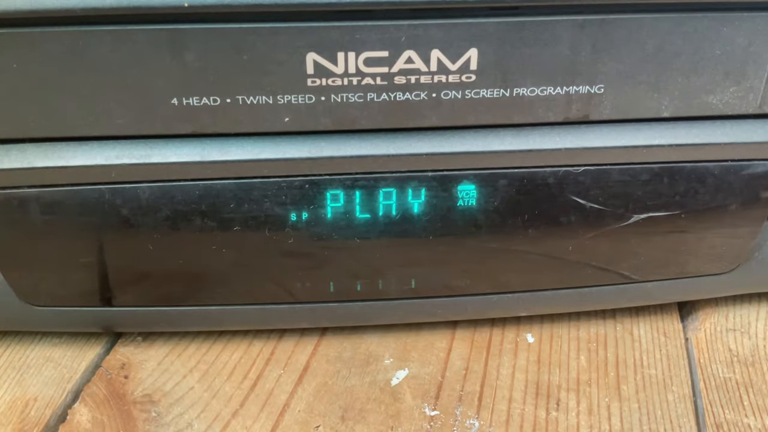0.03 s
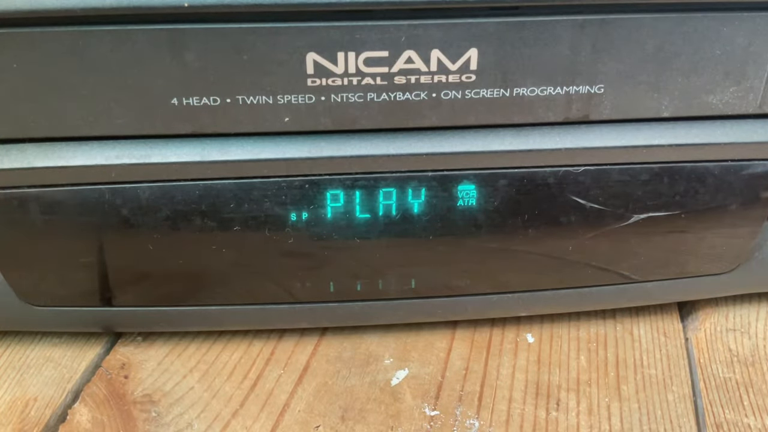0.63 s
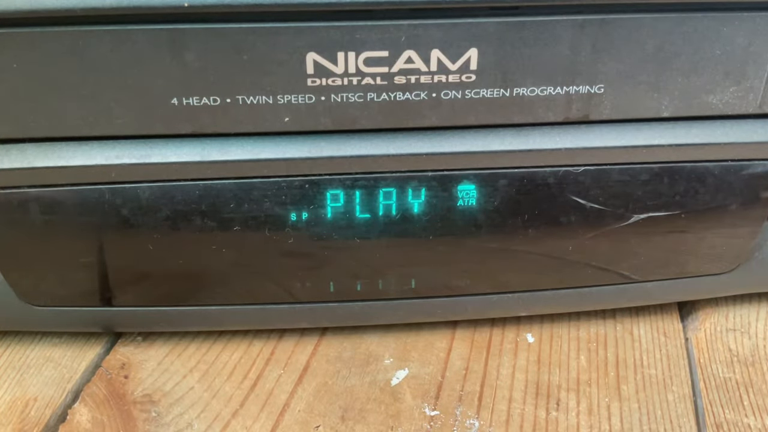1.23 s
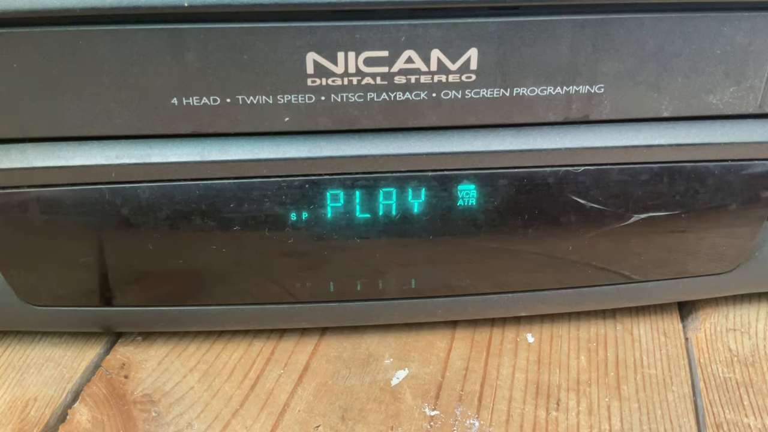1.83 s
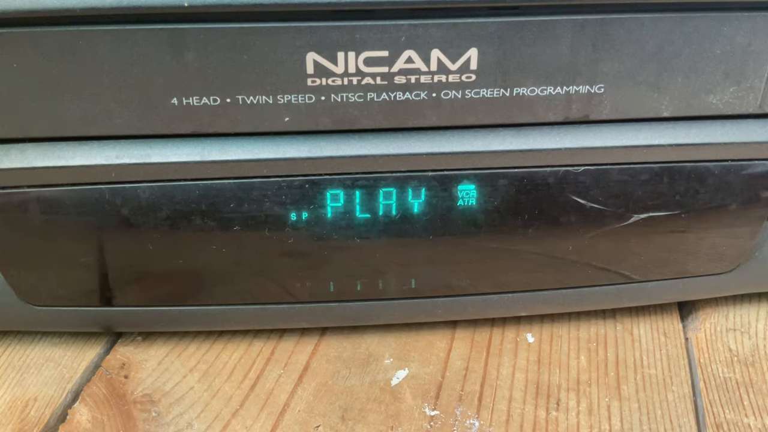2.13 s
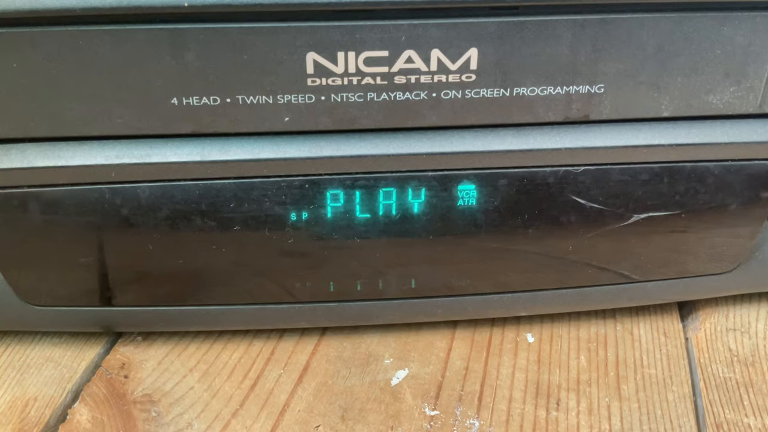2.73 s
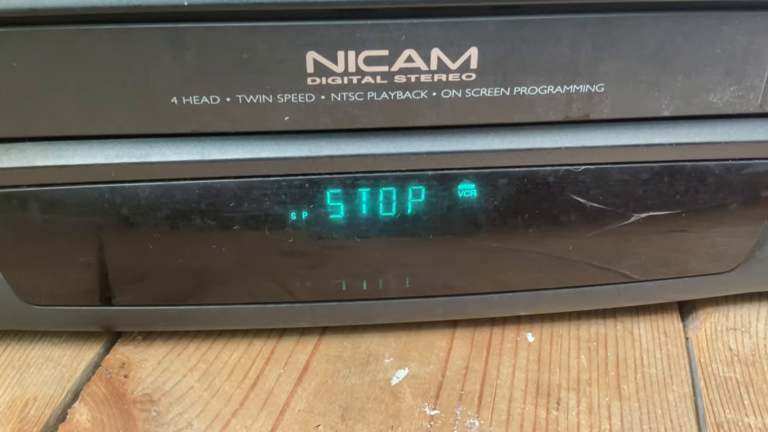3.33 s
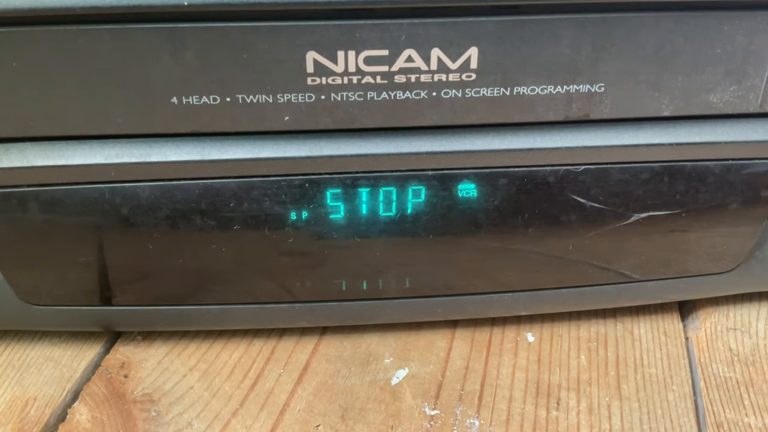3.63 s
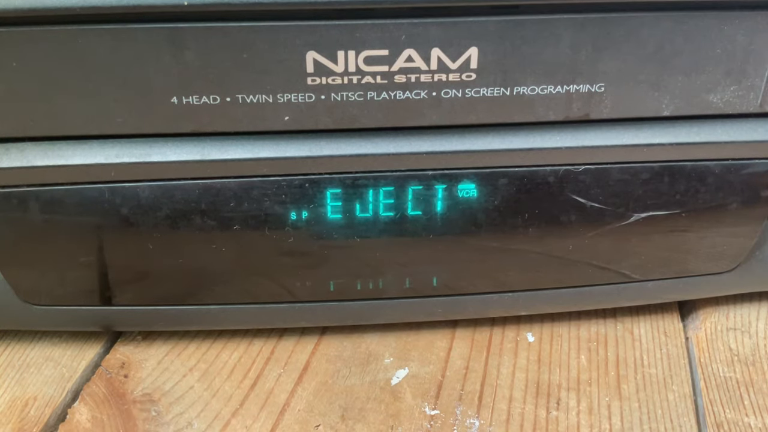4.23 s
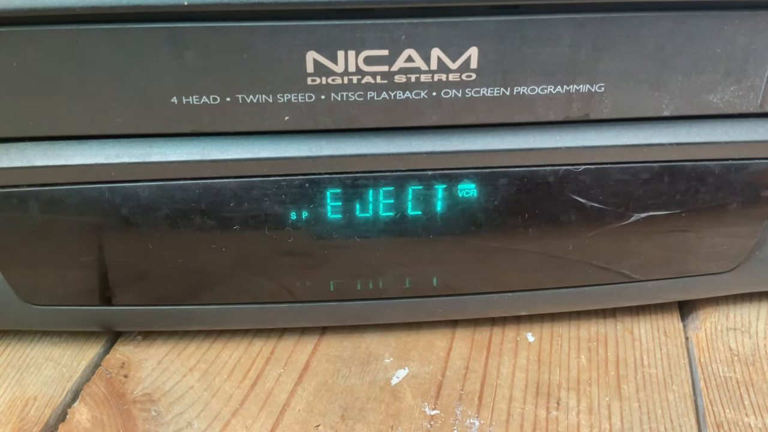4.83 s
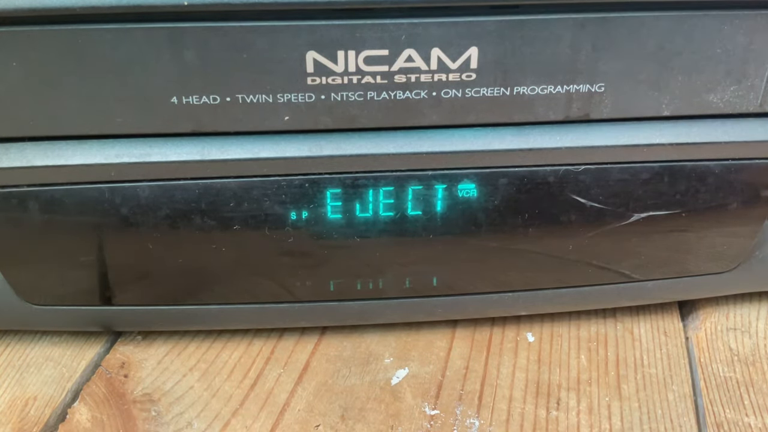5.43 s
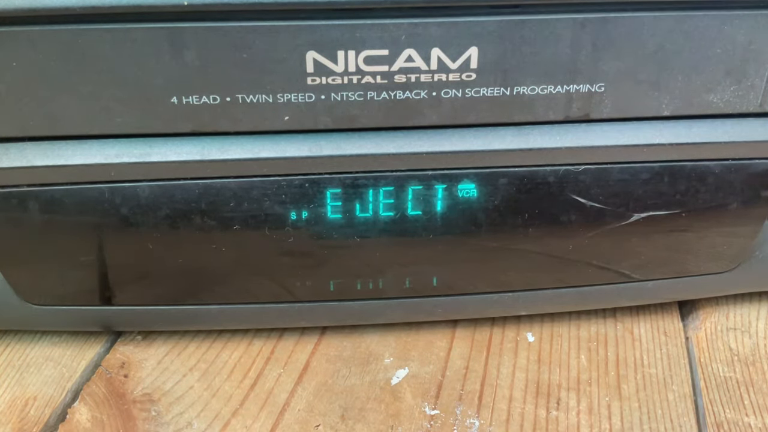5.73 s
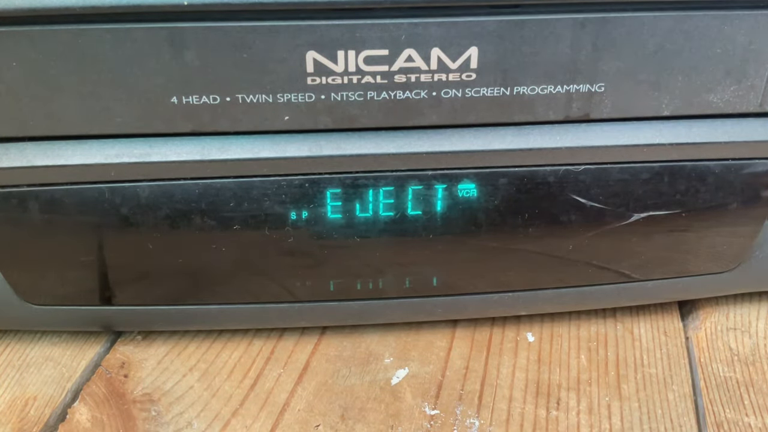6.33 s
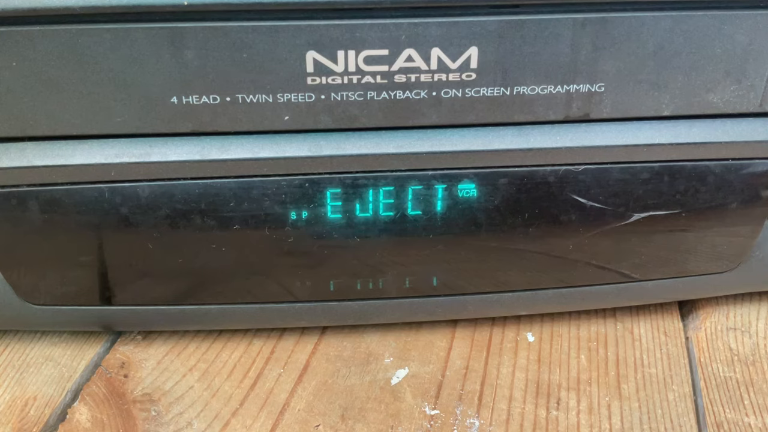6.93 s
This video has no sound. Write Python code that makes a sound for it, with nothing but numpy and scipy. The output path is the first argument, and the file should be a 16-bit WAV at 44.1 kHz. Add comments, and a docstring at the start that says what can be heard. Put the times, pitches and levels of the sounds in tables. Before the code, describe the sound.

A video recorder stops and ejects its cassette, heard close by in a quiet room. A small motor hums and whines through its gears while levers click. It rests, leaving only the faint whir of the spinning head drum. A latch snaps and the motor starts again, with sharp clunks and a very brief pause, then slides the cassette out with plastic scraping and a string of clicks.

```python
"""A video cassette deck on a wooden floor stops and ejects its cassette, close by in a quiet room.
First a small DC motor unthreads the tape through a gear train, humming and whining as levers click.
From 2.4 s it rests and the head drum whirs on. At 4 s a latch snaps, and the motor frees the cassette.
After a short pause at 5.6 s it slides the carriage out, plastic rubbing on the guides, until 7.1 s.
Throughout, each impact excites the damped modes of the deck and the cabinet."""
import sys
import numpy as np
from scipy import signal
from scipy.fft import rfft, irfft, next_fast_len
from scipy.io import wavfile
from scipy.ndimage import uniform_filter1d, map_coordinates

SR = 44100
rng = np.random.default_rng(int(sys.argv[2]) if len(sys.argv) > 2 else 0)


def waveform_to_disk(signal):
    """Save audio, clipped to [-1, 1], as 16-bit WAV at the path in sys.argv[1]."""
    frames = np.transpose(np.atleast_2d(signal))
    scaled = np.clip(frames, -1, 1) * 32767
    samples = np.round(scaled).astype(np.int16)
    wavfile.write(sys.argv[1], SR, samples)


N = 317079
TIME = np.arange(N) / SR

# Motor runs: unthread, release, slide out. All levels in the tables are relative.
# Each row: on and off in seconds, then hum, gear rumble, sliding friction and brush hiss in dB.
RUNS = [(-0.3, 2.395, -51.5, -48, -48.5, -54.5), (4.24, 5.64, -49, -51.5, -55, -52),
        (5.76, 7.09, -49, -48.5, -52.5, -51.5)]
# Shaft speed moving the tape, and the cassette. Each row: time in seconds, rotation rate in Hz.
TAPE_SPEED = [(0.0, 71.6), (0.04, 71.3), (0.38, 74.96), (0.67, 68.33), (0.79, 67.86), (0.92, 76.4),
              (1.07, 63.6), (1.14, 71.5), (1.19, 74.44), (1.31, 70.33), (1.43, 74.7), (1.6, 75.13),
              (1.87, 73.23), (2.08, 75.94), (2.19, 67.78), (2.37, 75.25), (2.55, 67.9)]
CASSETTE_SPEED = [(4.24, 60.15), (4.43, 72.4), (4.46, 73.44), (4.9, 75.96), (5.23, 74.6), (5.39, 74.75),
                  (5.5, 79.4), (5.59, 77), (5.62, 75.16), (5.85, 69.4), (5.96, 77.1), (6.0, 79.0),
                  (6.28, 74.82), (6.42, 77.37), (6.88, 79.41), (6.95, 77.6), (7.06, 79.76), (7.19, 74.0)]
# Harmonics of the hum. Each row: multiple of the shaft rate, level in dB.
UNTHREAD_ORDERS = [(2, -15.5), (3, 3), (4, -1.5), (5, -16), (6, -22), (7, -14.5), (8, -21.5), (9, -6),
                   (10, -8), (11, -14), (12, -8), (13, -13), (16, -28), (18, -10.5), (24, -13)]
EJECT_ORDERS = [(3, 1), (4, -15.5), (5, -14), (6, -6.5), (7, -14), (9, -5), (12, -12), (13, -20), (14, -21),
                (16, -11.5), (17, -8), (18, -14.5), (21, -14.5), (23, -18), (24, -25), (27, -8.5)]
# Drive load, rotor shake and gear whine, one list a run. Each row: time in seconds, level in dB.
LOAD = [
    [(0.0, -50), (0.58, -52.5), (0.85, -47), (1.14, -54.5), (1.93, -53), (2.29, -55), (2.34, -51),
     (2.4, -56.5)],
    [(4.24, -32), (4.308, -49), (4.958, -47.5), (5.274, -50.5), (5.456, -46.5), (5.6, -45)],
    [(5.76, -46.5), (6.11, -45), (6.562, -46), (6.96, -47), (7.1, -44.5)],
]
SHAKE = [
    [(0.0, -57), (0.06, -56), (0.19, -85), (0.25, -66), (0.55, -64.5), (0.9, -52), (1.08, -77),
     (1.24, -53.5), (1.36, -62), (2.54, -57.5), (2.58, -66)],
    [(4.3, -67), (4.418, -48.5), (4.476, -47), (4.556, -46.5), (4.596, -54.5), (4.746, -49), (5.442, -48),
     (5.58, -67), (5.608, -52), (5.696, -61), (5.72, -66)],
    [(5.8, -67), (5.964, -48), (6.032, -62), (6.156, -50.5), (6.464, -51), (6.524, -60), (6.63, -71),
     (6.724, -52.5), (6.882, -60), (6.972, -49.5), (7.15, -60)],
]
WHINE = [
    [(0.0, -48.5), (0.25, -57), (0.41, -58), (0.68, -57.5), (0.81, -55), (1.9, -53), (2.26, -60.5),
     (2.36, -60)],
    [(4.36, -55), (4.442, -44.5), (4.62, -49.5), (4.786, -43.5), (4.916, -57), (4.982, -43.5), (5.294, -47),
     (5.38, -44)],
    [(5.8, -53), (5.91, -40), (6.068, -46.5), (6.322, -36), (6.382, -46), (6.478, -41.5), (6.964, -42),
     (6.986, -40.5), (7.102, -43.5), (7.14, -52)],
]
# Broad spectra of gears, sliding plastic, brushes, impacts and drum.
# Each row: frequency in Hz, level in dB.
GEAR_SPECTRUM = [(29, -35), (50, -29), (76, -4), (110, -10), (223, 2.5), (300, -9.5), (427, -10),
                 (573, -15), (722, -8.5), (999, -13.5), (1200, -5.5), (1470, -35.5), (2000, -42),
                 (4400, -68)]
SLIDE_SPECTRUM = [(820, -33), (1400, -22), (1470, -9), (1810, 3.5), (2800, 1.5), (3780, -7), (4430, -2),
                  (7950, -7.5), (8870, -14), (10900, -3.5), (11800, -30), (12400, -4), (15000, 5)]
BRUSH_SPECTRUM = [(880, -21), (1500, -29), (1900, -29), (2000, -24), (2160, -7), (2790, -12.5), (3600, -7),
                  (4260, -9), (8010, -11), (10000, -8.5), (12800, -18.5), (14200, -37.5), (15800, -1.5)]
IMPACT_SPECTRUM = [(100, -16), (250, 1.5), (500, -2), (4500, 1.5), (6200, -0.5), (8000, -3), (10000, -1),
                   (13000, -8), (16000, -11)]
DRUM_SPECTRUM = [(29, -56), (50, -12.5), (251, -7), (270, -14.5), (352, -7.5), (493, -16), (878, -3.5),
                 (991, -14), (1060, -4), (2600, -11.5), (3070, -9), (3910, -15.5), (5220, -12),
                 (5750, -19.5), (15800, -21.5)]
# Resonances of motor can, cabinet, tape deck and drum housing.
# Each row: centre in Hz, width in Hz, peak in dB.
CAN_MODES = [(4270, 110, 17), (6010, 83, 17), (7200, 920, 10), (8120, 140, 14), (11110, 430, 9.5),
             (12700, 870, 18.5), (14630, 170, 0.5), (15620, 150, -5)]
CABINET_MODES = [(301, 28, 9.5), (377, 45, 6), (484, 36, -0.5), (740, 35, 2.5), (1100, 150, 0.5),
                 (1334, 55, 18.5)]
DECK_MODES = [(320, 113, 10.5), (479, 50, 9.5), (759, 120, 11.5), (885, 120, 3.5), (1154, 340, 11),
              (1930, 230, 5), (2910, 380, 6.5), (3790, 270, -6), (4500, 3500, 9), (7740, 1500, 8)]
HOUSING_MODES = [(775, 260, 3.5), (2110, 1200, 5), (3050, 200, 2.5), (3660, 140, 6), (3780, 280, -8.5),
                 (4460, 640, 9.5), (5350, 180, 8.5), (9770, 280, 5.5)]
# Impacts of levers, cams and latches. Each row: start in seconds, snap in dB, thud in dB,
# snap tilt in dB per octave, the part's resonance in Hz, contact decay by 60 dB in seconds.
CLICKS = [(0.21, -29, -34.5, 3, 700, 0.049), (0.383, -38, -64, 2, 6000, .024),
          (0.584, -42, -53, 4, 7160, 0.045), (0.6043, -33, -45.5, 1.5, 6816, 0.038),
          (0.643, -36, -39.5, -11, 2370, 0.021), (0.71, -41, -39, 2, 790, 0.029),
          (0.7234, -36.5, -30, 3.5, 724, 0.08), (0.7839, -32, -40, -7, 3020, .016),
          (0.867, -23.5, -34.5, 0, 7310, .025), (0.9635, -36.5, -34.5, -2.5, 1900, .02),
          (0.9912, -29, -50, -1, 5320, 0.062), (2.385, -60, -41, 7, 1340, .04),
          (4.053, -19, -35, 3, 3700, 0.022), (4.193, -29.5, -29, -4.5, 1920, .045),
          (4.26, -32.5, -34.5, -3, 693, 0.019), (4.301, -30.5, -35, 4, 4170, 0.027),
          (5.398, -18, -33.5, 1, 4790, 0.021), (5.5962, -30.5, -34.5, -0.5, 4760, .028),
          (5.613, -19, -23.5, 0, 4730, .03), (5.698, -34, -49, 1, 764, 0.052),
          (5.71, -40, -34, -9.5, 1350, 0.037), (5.7556, -38, -40, 0.5, 6590, 0.057),
          (5.961, -38.5, -38, 0.5, 730, .035), (6.175, -37.5, -37, -4, 5390, .028),
          (6.3062, -29.5, -51, 9, 5210, .034), (6.324, -33, -37, -9.5, 5280, .028),
          (6.3615, -29.5, -36, 2, 5334, 0.025), (6.4324, -25.5, -34.5, 2.5, 6000, 0.052),
          (6.459, -34.5, -40, 1.5, 6840, 0.033), (6.6017, -27.5, -37.5, -0.5, 5100, 0.036),
          (6.657, -27.5, -44, -2.5, 2845, .028), (6.7028, -34.5, -55, 6, 7025, .023),
          (6.746, -31.5, -40.5, 0, 7200, .032), (6.905, -28.5, -39, 1.5, 5306, 0.044),
          (6.921, -34, -44, -2.5, 1980, 0.034), (6.981, -27.5, -51.5, -7.5, 5970, 0.027),
          (6.989, -23, -31, 3, 5940, .039)]
# Bands of the thud and the snap. Each row: lower and upper edge in Hz.
CLICK_BANDS = [(150, 1500), (1500, 17000)]
# Reverberation of cabinet and room. Each row: frequency in Hz, decay by 60 dB in seconds.
RING_T60 = [(200, 0.4), (500, 0.24), (1200, 0.16), (3000, 0.11), (8000, 0.17), (15000, 0.18)]
# Dragging parts. Each row: start and end in seconds, level in dB, resonance in Hz.
RUBS = [(0, 0.308, -50.5, 2260), (0, 0.182, -57, 1080), (0.723, .83, -43, 188), (2.103, 2.167, -55, 1058),
        (2.235, 2.299, -57, 1230), (5.779, 5.87, -47, 1200), (6.125, 6.192, -41.5, 785),
        (6.143, 6.23, -44, 241), (6.332, 6.384, -45, 790), (6.672, 6.7, -42.5, 180.6)]
# The cassette scraping its guides, and a panel groaning as the drive's load changes.
# Each row: start and end in seconds, level in dB.
SCRAPES = [(4.62, 4.744, -54), (6.13, 6.225, -49.5), (6.291, 6.365, -37.5), (6.371, 6.426, -45.5)]
GROANS = [(1.0, 1.133, -51), (2.394, 2.511, -58.5), (4.313, 4.387, -45)]
# Whir of the head drum. Each row: time in seconds, level in dB.
DRUM_LEVEL = [(2.6, -57.5), (2.758, -57), (3.118, -60.5), (4.0, -59)]
# Faint tones of the drum. Each row: frequency in Hz, level in dB.
DRUM_TONES = [(699.8, -71.5), (882.9, -69), (1050, -73)]

FREE_LOAD_DB, STRAIN_RANGE_DB = -49, 4  # gears run freely up to this load, judder fully this far above
SWITCH_S, SPIN_UP_S, COAST_S, SHAKE_HOLD_S = 0.023, 0.15, 0.043, 0.2
CRUISE_HZ, HUM_DB_PER_HZ = 77.4, 0.5
GEAR_TEETH, DRUM_HZ = 15, 25


def drive(run, speed_curve, orders):
    """Rotating machinery: shaft speed sets the pitch of a run, and load its roughness."""
    on, off, hum_db, rumble_db, slide_db, brush_db = RUNS[run]
    speed = curve(speed_curve)
    mean_hz = speed.mean()
    load_db = curve(LOAD[run]) - FREE_LOAD_DB
    strain = np.clip(load_db / STRAIN_RANGE_DB, 0, 1)
    turns = np.cumsum(speed * (1 + 0.00151 * wobble(25))) / SR
    shaft = 2 * np.pi * turns
    hum = amp(hum_db + 0.064 * load_db) * motor_hum(shaft, speed, orders, strain)
    whine = amp(curve(WHINE[run])) * gear_whine(shaft, strain)
    shake = amp(curve(SHAKE[run])) * partial(shaft, 0.99, strain)  # rotor unbalance, about once a turn
    rumble = amp(rumble_db + load_db) * gear_rumble(turns, mean_hz, strain)
    sliding = amp(slide_db + 1.2 * load_db) * sliding_plastic(turns, mean_hz, strain)
    hiss = amp(brush_db) * brush_hiss(turns, mean_hz)
    power = envelope(on, off, SWITCH_S)
    spin_up = np.clip((TIME - on) / SPIN_UP_S, 0, 1) ** 2
    running = power * (spin_up * (hum + whine) + rumble + sliding + hiss)
    shaking = envelope(on, off + SHAKE_HOLD_S, SPIN_UP_S) * shake
    return running + shaking + loose_ticks(strain * power)


def motor_hum(shaft, speed, orders, strain):
    """Periodic forces on a three-pole rotor give harmonics; judder weakens the highest most."""
    smear_db = 2 * strain / GEAR_TEETH
    hum = sum(amp(db - smear_db * order) * partial(shaft, order, strain) for order, db in orders)
    return amp(HUM_DB_PER_HZ * (speed - CRUISE_HZ)) * hum


def gear_whine(shaft, strain):
    """Teeth meet at the mesh frequency; their unevenness modulates the tone into sidebands."""
    sidebands = amp(-13 + 3.3 * strain) * wobble(260) * np.sin(GEAR_TEETH * shaft)
    return partial(shaft, GEAR_TEETH, strain / 2) + sidebands


def gear_rumble(turns, turn_hz, strain):
    """Forced vibration: teeth knock hardest once a turn and drive the cabinet's modes."""
    rattle_db = (1.7 + 0.83 * strain) * wobble(70)
    knock_db = 1.5 * np.cos(2 * np.pi * turns)
    teeth = roughness(turns, turn_hz, repeat=0.11 * (1 - strain)) * amp(knock_db + rattle_db)
    return unit(coloured(teeth, GEAR_SPECTRUM, CABINET_MODES))


def sliding_plastic(turns, turn_hz, strain):
    """Dry friction: tiny uneven slips excite the upper modes of the deck."""
    surface = roughness(turns, turn_hz, repeat=0.76 * (1 - strain))
    slips = surface * amp(2.3 * wobble(350) + 1.5 * wobble(50))
    return unit(coloured(slips, SLIDE_SPECTRUM, DECK_MODES[5:]))


def brush_hiss(turns, turn_hz):
    """Sliding contact: brushes scrape over the commutator gaps and the motor can resonates."""
    gaps_db = 0.8 * np.cos(4 * np.pi * turns)
    scrape = roughness(turns, turn_hz, repeat=0.5) * amp(gaps_db + 1.4 * wobble(500))
    return unit(coloured(scrape, BRUSH_SPECTRUM, CAN_MODES))


def click(snap_db, thud_db, tilt_db, own_hz, decay_s, seat_s, own_db, own_q, ring_db, panel_db):
    """Impact excitation: a part chatters as it seats; deck and cabinet ring on in free decay."""
    t = np.arange(SR // 3) / SR
    contact = rng.standard_normal(len(t)) * amp(-60 * np.maximum(t - seat_s, 0) / decay_s)
    hz, frame_s, noise = signal.stft(rng.standard_normal(len(t)), SR, nperseg=256)
    # the low panel modes hold most of the ring
    share_db = along([(350, panel_db), (2500, ring_db), (12000, ring_db - 20)], hz)[:, None]
    fall_db = 60 * frame_s / along(RING_T60, hz)[:, None]
    tail = signal.istft(noise * amp(share_db - fall_db), SR, nperseg=256)[1][:len(t)]
    modes = DECK_MODES + [(own_hz, own_hz / own_q, own_db)]
    out = np.zeros(len(t))
    for band, db, tilt in zip(CLICK_BANDS, (thud_db, snap_db), (0, tilt_db)):
        # a harder contact tilts the snap towards the treble
        spectrum = [(f, level + tilt * np.log2(f / band[0])) for f, level in IMPACT_SPECTRUM]
        bandpass = signal.butter(4, band, "bandpass", fs=SR, output="sos")
        part = signal.sosfilt(bandpass, coloured(contact + tail, spectrum, modes))
        peak_rms = np.sqrt(uniform_filter1d(part ** 2, size=176).max())  # over 4 ms
        out += amp(db) * part / peak_rms
    return out


def levers():
    """Transients: each lever, cam and latch strikes at its own moment."""
    out = np.zeros(N + SR)
    for start_s, *impact in CLICKS:
        blow = click(*impact, seat_s=0.0036, own_db=9.5, own_q=10.2, ring_db=-4, panel_db=3)
        out[round(start_s * SR):][:len(blow)] += blow
    return amp(-1) * out[:N]


def loose_ticks(strain, per_second=28):
    """Rattle: under strain, loose teeth and guides collide at random moments."""
    out = np.zeros(N + SR)
    for when, softness, pitch in rng.random((int(per_second * N / SR), 3)):
        start = int(when * N)
        if strain[start] > 0.1:
            tick = click(snap_db=0, thud_db=0, tilt_db=-1.5, own_hz=2000 + 4000 * pitch, decay_s=0.017,
                         seat_s=0.001, own_db=6, own_q=8.9, ring_db=-7, panel_db=-12)
            out[start:][:len(tick)] += amp(-47 - 5.3 * softness) * strain[start] * tick
    return out[:N]


def drag(start, end, db, hz, q, grit_db):
    """Stick-slip friction: a dragging part feeds irregular pulses into one resonance."""
    slips = rng.standard_normal(N) * amp(grit_db * wobble(300))
    b, a = signal.iirpeak(hz, q, fs=SR)
    rub = signal.lfilter(b, a, signal.lfilter(b, a, slips))
    stroke = np.clip(np.minimum(TIME - start, TIME[-1] * 0 + end - TIME) / 0.0067, 0, 1)
    return amp(db) * stroke * rub / np.sqrt(np.average(rub ** 2, weights=stroke + 1e-9))


def dragging_parts():
    """Bandwidth sets timbre: a wide resonance rasps, a very wide one scrapes, a narrow one groans."""
    rasps = sum(drag(*row, q=2.05, grit_db=-0.5) for row in RUBS)
    scrapes = sum(drag(*row, hz=5000, q=0.8, grit_db=3.8) for row in SCRAPES)
    groans = sum(drag(*row, hz=374.6, q=38, grit_db=2.2) for row in GROANS)
    return rasps + scrapes + groans


def head_drum():
    """Amplitude modulation: the drum's motor pulls 2 and 6 times a turn, so its bearing noise buzzes."""
    turns = DRUM_HZ * TIME + 0.0004 * wobble(3)
    angle = 2 * np.pi * turns
    pull_db = 1.5 * np.cos(2 * angle) + 0.94 * np.cos(6 * angle)
    buzz = roughness(turns, DRUM_HZ, repeat=0.7) * amp(pull_db)
    whir = amp(curve(DRUM_LEVEL) + 0.5) * unit(coloured(buzz, DRUM_SPECTRUM, HOUSING_MODES))
    tones = sum(amp(db + 2 + 0.7 * wobble(7.2)) * np.sin(2 * np.pi * hz * TIME + 0.21 * wobble(6))
                for hz, db in DRUM_TONES)
    return whir + tones


def partial(shaft, order, strain):
    """Random modulation broadens one multiple of the shaft rate, more so under strain."""
    depth = np.sqrt(order / GEAR_TEETH)
    waver = 0.18 * (1 + strain) * depth
    flutter_db = (0.67 + 0.85 * strain) * depth
    phase = order * shaft + rng.uniform(0, 2 * np.pi) + waver * wobble(60)
    return np.sqrt(2) * amp(flutter_db * wobble(45)) * np.sin(phase)


def roughness(turns, turn_hz, repeat):
    """Surface noise of a rotating part: the share `repeat` of its power recurs on every turn."""
    track = rng.standard_normal(int(SR / turn_hz))
    periodic = map_coordinates(track, [turns % 1 * len(track)], mode="grid-wrap")
    return np.sqrt(repeat) * periodic + np.sqrt(1 - repeat) * rng.standard_normal(N)


def coloured(x, spectrum, modes):
    """Minimum-phase filtering by a broad spectrum with resonant peaks on it."""
    size = 2 * next_fast_len(len(x) // 2 + 4096)
    hz = np.fft.rfftfreq(size, 1 / SR)
    peaks_db = sum(peak / (1 + (2 * (hz - f) / width) ** 2) for f, width, peak in modes)
    gain = amp(np.maximum(along(spectrum, hz) + peaks_db, -100))
    cepstrum = irfft(np.log(gain))
    cepstrum[1:size // 2] *= 2  # folding the cepstrum makes the response causal
    cepstrum[size // 2 + 1:] = 0
    return irfft(rfft(x, size) * np.exp(rfft(cepstrum)))[:len(x)]


def envelope(on, off, attack_s):
    """A linear rise, a hold and an exponential decay as the motor coasts."""
    return np.clip((TIME - on) / attack_s, 0, 1) * np.exp(-np.maximum(TIME - off, 0) / COAST_S)


def wobble(rate):
    """Smooth random modulation through `rate` knots a second."""
    knots = rng.standard_normal(int(N * rate / SR) + 4)
    steps = np.arange(0, len(knots) - 1, 1 / 8)
    return np.interp(TIME * rate, steps, map_coordinates(knots, [steps]))


def curve(points):
    """Linear interpolation of (seconds, value) points at every sample."""
    return np.interp(TIME, *np.transpose(points))


def along(points, hz):
    """Interpolation of (Hz, value) points on a logarithmic frequency axis."""
    f, values = np.transpose(points)
    return np.interp(np.log(hz + 1), np.log(f + 1), values)


def amp(db):
    """Decibels to amplitude ratio."""
    return 10 ** (np.asarray(db) / 20)


def unit(x):
    """Normalisation to rms 1."""
    return x / np.sqrt(np.mean(x ** 2) + 1e-20)


def scene():
    """Superposition of three motor runs, drum, friction and impacts in one channel."""
    unthread = drive(0, TAPE_SPEED, UNTHREAD_ORDERS)
    release = drive(1, CASSETTE_SPEED, EJECT_ORDERS)
    slide_out = drive(2, CASSETTE_SPEED, EJECT_ORDERS)
    return (unthread + release + slide_out + head_drum() + dragging_parts() + levers())[None]


def record(dry):
    """Soft saturation rounds the tallest peaks, and a band limit removes the highest treble."""
    ceiling, top_hz = 0.33, 15900
    rounded = dry / (1 + (dry / ceiling) ** 4) ** 0.25
    size = next_fast_len(N + SR // 2)
    passband = np.fft.rfftfreq(size, 1 / SR) < top_hz
    return irfft(rfft(rounded, size) * passband, size)[..., :N]


dry = scene()
out = record(dry)
waveform_to_disk(out)
```